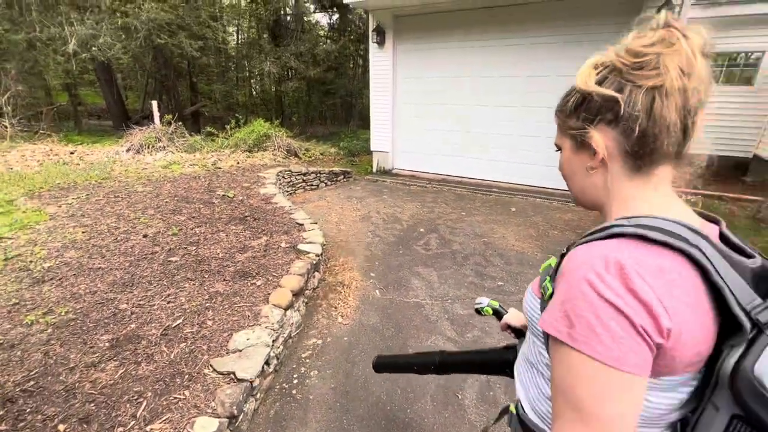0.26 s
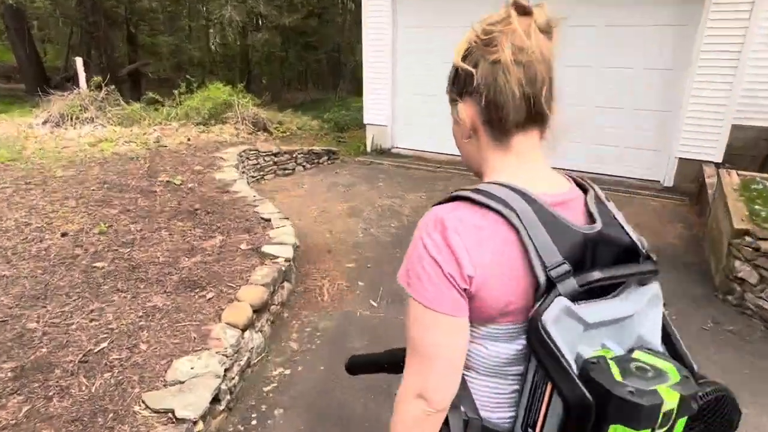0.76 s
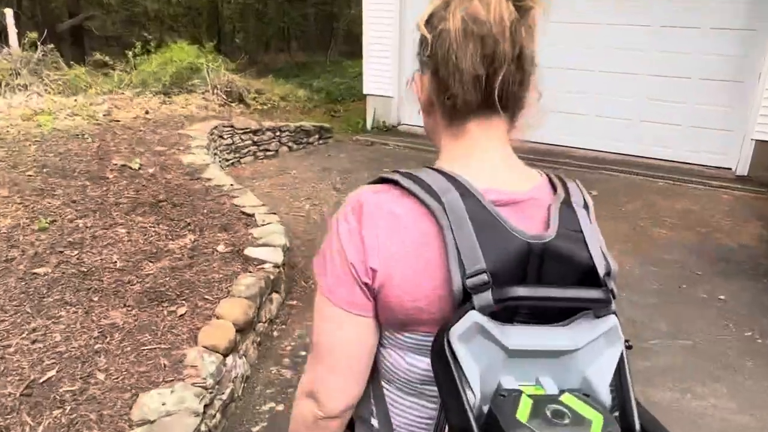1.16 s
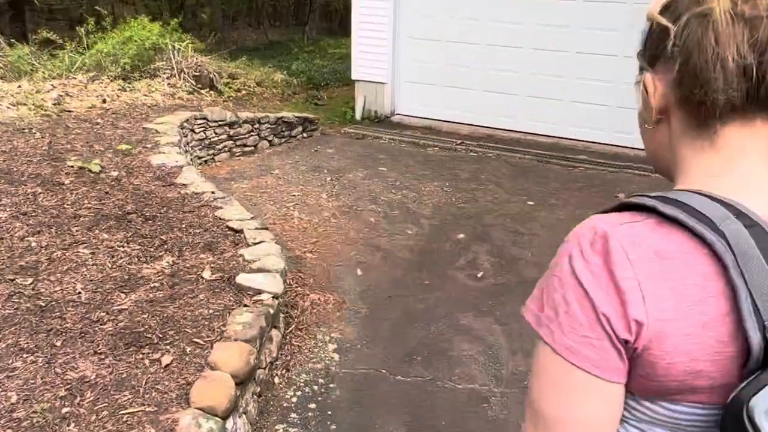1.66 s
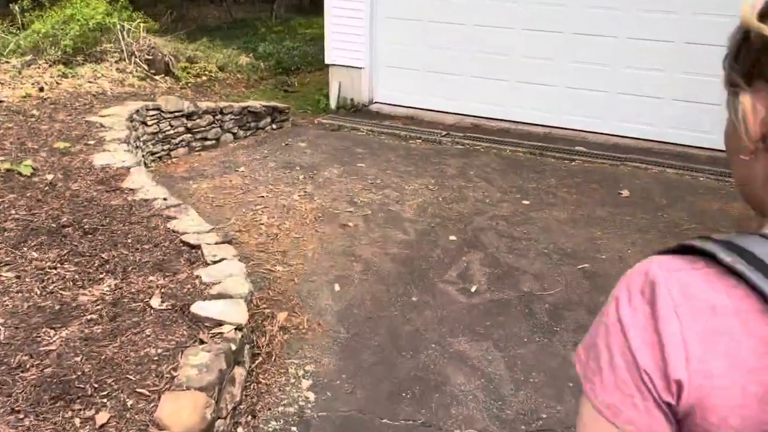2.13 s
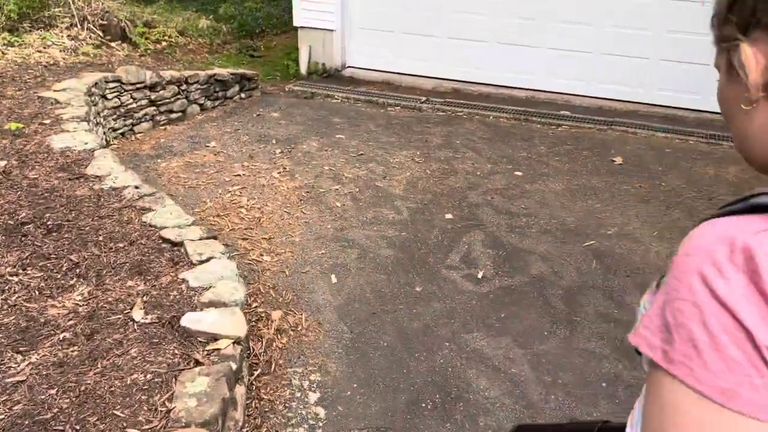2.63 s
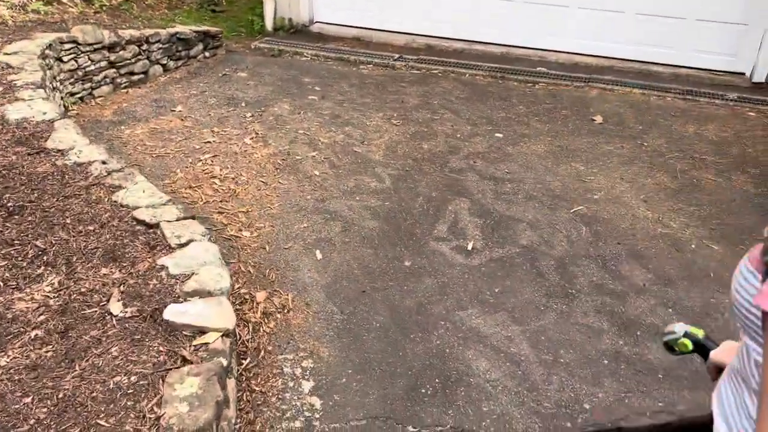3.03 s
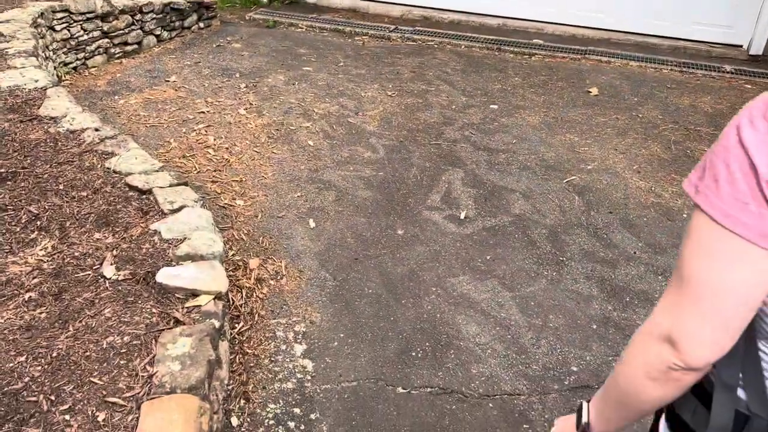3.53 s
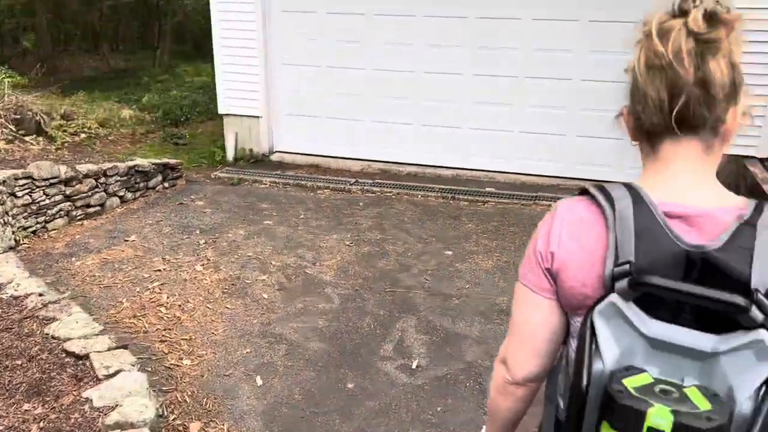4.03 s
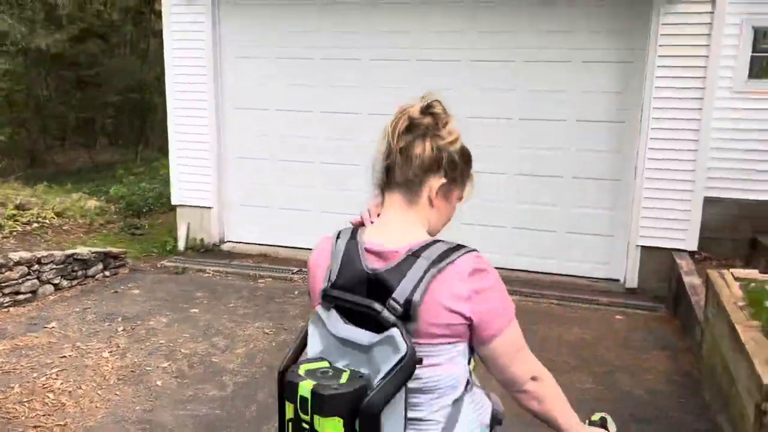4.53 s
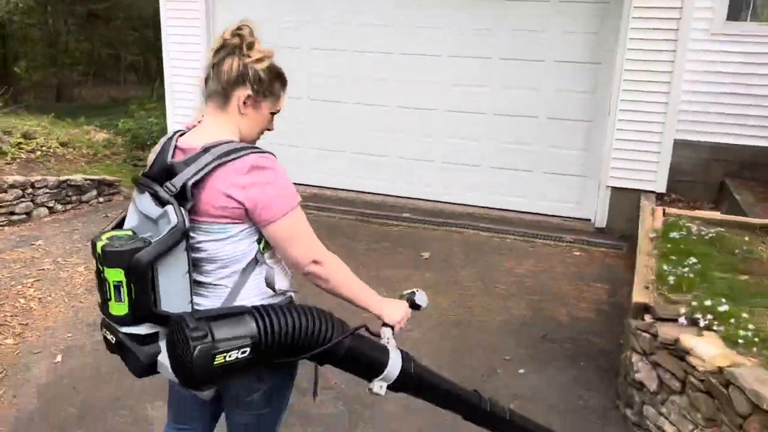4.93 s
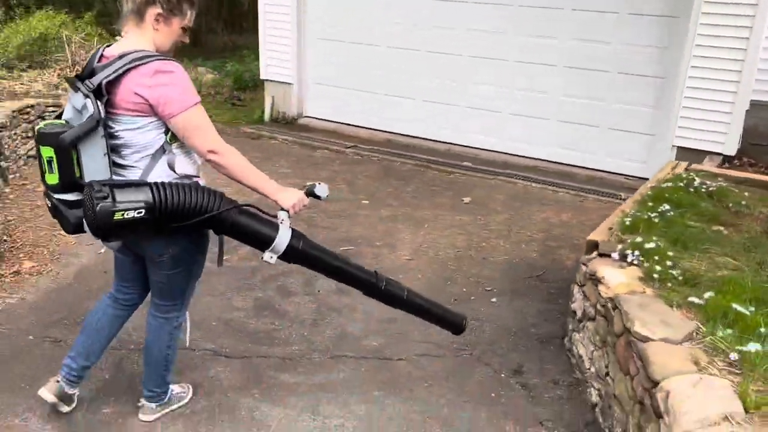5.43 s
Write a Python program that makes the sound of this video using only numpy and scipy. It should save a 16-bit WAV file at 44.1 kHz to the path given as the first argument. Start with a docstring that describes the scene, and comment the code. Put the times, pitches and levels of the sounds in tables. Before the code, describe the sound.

A battery-powered backpack leaf blower runs at full speed on a driveway, a step or two from the microphone. A loud, hissing rush of air carries a hollow hum from the tube and a thin, high fan whine. The hiss and whine swell twice as the wearer's back turns toward the microphone, then ease near the end, when a lower roar of air comes forward a little.

```python
"""A loud rush of air with a high whine in it: a battery backpack leaf blower at full speed on a
driveway, a step or two ahead. Turbulence makes the rush, ringing in the tube and roaring out over the
asphalt. The twelve-blade fan hums at the shaft rate and whines at the blade-passing rate. The intake
hiss is beamed backwards, so it swells whenever the wearer's back turns to the microphone."""
import sys
import numpy as np
from scipy import signal
from scipy.fft import rfft, irfft
from scipy.io import wavfile
from scipy.ndimage import map_coordinates

SR = 44100
rng = np.random.default_rng(int(sys.argv[2]) if len(sys.argv) > 2 else 0)


def materialize(psi):
    """Save the field psi as 16-bit PCM at rate SR to the path in sys.argv[1].

    A 1-D psi becomes a single channel; in a 2-D psi each row is a channel.
    """
    bounded = np.clip(np.atleast_2d(psi).T, -1, 1)
    quanta = np.round(bounded * 32767).astype(np.int16)
    wavfile.write(sys.argv[1], SR, quanta)


N = 250929
T = np.arange(N) / SR
HZ = np.maximum(np.arange(N // 2 + 1) * SR / N, 1)


def from_db(db):
    """Amplitude ratio: tenfold for every 20 dB."""
    return 10 ** (np.asarray(db) / 20)


def rms_one(x):
    """Normalisation to unit power."""
    return x / np.sqrt(np.mean(x ** 2) + 1e-20)


def curves(rows):
    """Linear interpolation in time, one curve per value column."""
    times, *columns = np.transpose(rows)
    return [np.interp(T, times, column) for column in columns]


def curve(rows):
    """Linear interpolation in time of the first value column."""
    return curves(rows)[0]


def over_hz(points):
    """Interpolation on a logarithmic frequency axis."""
    hz, value = np.transpose(points)
    return np.interp(np.log(HZ), np.log(hz), value)


def drift(rate_hz):
    """Random modulation: low-passed noise of unit power."""
    step, settle = 40, 2000
    pole = np.exp(-2 * np.pi * rate_hz * step / SR)
    white = rng.standard_normal(N // step + settle + 2)
    slow = signal.lfilter([1], [1, -2 * pole, pole * pole], white)[settle:]
    return np.interp(np.arange(N) / step, np.arange(len(slow)), rms_one(slow))


def complex_drift(rate_hz):
    """Quadrature modulation: random in both amplitude and phase."""
    return drift(rate_hz) + 1j * drift(rate_hz)


def narrow_noise(hz, width_hz):
    """Narrow-band noise: a randomly modulated carrier of unit power."""
    return rms_one(np.real(complex_drift(width_hz) * np.exp(2j * np.pi * hz * T)))


def pan(balance_db):
    """Constant-power panning; a positive balance favours the left."""
    gains = from_db(np.array([balance_db, -balance_db]).reshape(2, -1) / 2)
    return gains / np.sqrt(np.mean(gains ** 2, axis=0))


def delayed(channel, delay_ms):
    """Propagation delay along a changing path."""
    return map_coordinates(channel, [np.arange(N) - delay_ms * SR / 1000], order=3, mode="mirror")


# Direction of the blower: time_s, left_lag_ms, balance_db
BEARING = [(0, 0.15, 0.5), (.55, .12, 0.5), (1.12, 0.013, -0.5), (1.75, 0.095, -2.5), (2.4, 0.056, -4),
           (3.8, 0.089, -3.5), (4.14, 0.015, -2.3), (4.52, -0.0062, -1.5), (4.78, -0.06, 3),
           (5.69, -0.11, 3.5)]
def place(x, lag_ms, balance_db):
    """Time and level differences between the two microphone ports give a source its direction."""
    return np.array([delayed(x[0], lag_ms / 2), delayed(x[1], -lag_ms / 2)]) * pan(balance_db)


def reflect(x, delay_ms, strength):
    """Comb filtering: a sound interferes with its moving echo."""
    echo = np.array([delayed(channel, delay_ms) for channel in x])
    return (x + strength * echo) / np.sqrt(1 + strength ** 2)


# Echo off the wearer's back: time_s, delay_ms, strength
BACK_ECHO = [(0, 0.69, 0.077), (.5, 0.59, 0.1), (.8, 0.42, 0.22), (1.85, 0.41, 0.13), (2.45, 0.36, 0.18),
             (3.0, 0.56, 0.053), (3.55, 0.4, 0.083), (3.95, 0.5, 0.34), (4.2, 0.615, 0.29),
             (4.5, 0.74, 0.25), (4.9, 0.85, 0.17), (5.69, 0.97, 0.22)]
TREBLE_ECHO_SHARE = 0.45  # clothing returns less of the treble
def off_back(x, share=1):
    """Reflection off the wearer: the delay grows and the comb slides down as the pack turns away."""
    delay_ms, strength = curves(BACK_ECHO)
    return reflect(x, delay_ms, share * strength)


# The wearer's walk: time_s, distance_m
WALK = [(0, 1.22), (1.0, 1.17), (2.5, 1.1), (3.1, 1.13), (3.7, 1.07), (4.1, 1.07), (4.6, 1.24),
        (5.05, 1.46), (5.35, 1.64), (5.69, 1.95)]
def off_ground(x):
    """Ground reflection: with distance the asphalt's echo follows sooner and stronger."""
    distance_m = curve(WALK)
    return reflect(x, delay_ms=2.45 / distance_m, strength=0.13 * distance_m)


# Echoes off the pack, arms and stone edging: shortest_ms, longest_ms, wander_ms, strength
SCATTER = (1.0, 5.0, .09, .125)
def scattered(x, count):
    """Scattering: faint echoes on wandering paths ripple the spectrum."""
    shortest_ms, longest_ms, wander_ms, strength = SCATTER
    total = x
    for delay_ms in np.geomspace(shortest_ms, longest_ms, count) * rng.uniform(0.9, 1.1, count):
        path_ms = delay_ms + wander_ms * drift(0.61)
        sign = rng.choice([-1, 1])
        total = total + sign * strength * np.array([delayed(channel, path_ms) for channel in x])
    return total / np.sqrt(1 + count * strength ** 2)


# A dip that slides down the treble as the wearer turns: time_s, centre_hz, depth
NOTCH = [(3.88, 15000, 0.2), (4.05, 13900, 0.7), (4.16, 12600, 0.8), (4.27, 11700, 0.75), (4.5, 10800, 0)]
def sliding_notch(x, width_hz=3000):
    """Cancellation: subtracting a moving band leaves a notch."""
    centre_hz, depth = curves(NOTCH)
    carrier = np.exp(2j * np.pi * np.cumsum(centre_hz) / SR)
    pole = np.exp(-np.pi * width_hz / SR)
    band = 2 * np.real(carrier * signal.lfilter([1 - pole], [1, -pole], x / carrier))
    return x - depth * band


# Likeness of the two ports at full width: frequency_hz, correlation
PORT_CORRELATION = [(60, 0.8), (140, 0.96), (280, 0.89), (550, 0.95), (750, 1), (1000, 0.98), (1200, 0.66),
                    (1500, 0.93), (2000, 0.8), (3200, 0.39), (4500, 0.22), (6100, 0.45), (8000, 1),
                    (9000, 0.65), (10500, -0.76), (12000, -0.28), (15500, -0.28)]
# Spread of the air noise, narrowest when the blower is dead ahead: time_s, width
AIR_WIDTH = [(0, 0.86), (.7, 0.9), (1.14, 0.64), (1.6, 0.72), (3.75, 0.82), (4.15, 0.4), (4.5, 0.2),
             (4.8, 0.7), (5.69, 0.8)]
def air_noise(spectrum, flutter_db, modes=(), width=AIR_WIDTH):
    """Spectral shaping: fluttering noise, lifted at resonances, partly coherent between the ports."""
    power = from_db(over_hz(spectrum)) ** 2
    lift = 1 + sum((from_db(db) ** 2 - 1) / (1 + (2 * (HZ - hz) / width_hz) ** 2) ** 1.5
                   for hz, width_hz, db in modes)
    alike = np.clip(over_hz(PORT_CORRELATION), -0.99, 0.99)
    shares = np.array([1 + alike, 1 - alike, 1 - alike])
    white = rng.standard_normal(shares.shape) + 1j * rng.standard_normal(shares.shape)
    direct, ahead, aside = irfft(white * np.sqrt(shares * power * lift), N)
    apart = np.clip(curve(width), 0, 1)
    ports = direct + np.sqrt(1 - apart ** 2) * ahead + apart * aside * [[1], [-1]]
    return rms_one(ports) * from_db(flutter_db * drift(20.5))


# Fan speed at full throttle, hunting a little with the load: time_s, blade_rate_hz
FAN_SPEED = [(0, 8580), (0.06, 8562), (0.3, 8590), (0.37, 8551), (0.53, 8575), (0.68, 8523), (0.79, 8570),
             (0.87, 8543), (1.05, 8598), (1.28, 8604), (1.47, 8555), (1.6, 8577), (1.84, 8553),
             (1.97, 8575), (2.23, 8561), (2.3, 8587), (2.4, 8583), (2.5, 8550), (2.58, 8585), (2.75, 8602),
             (2.9, 8584), (3.0, 8550), (3.13, 8597), (3.47, 8548), (3.66, 8591), (3.92, 8550), (4.02, 8582),
             (4.2, 8593), (4.28, 8575), (4.34, 8522), (4.48, 8589), (4.58, 8557), (4.92, 8540),
             (5.02, 8565), (5.11, 8533), (5.2, 8564), (5.31, 8531), (5.5, 8555), (5.58, 8587), (5.69, 8586)]
BLADES = 12
def shaft_angle():
    """Rotor phase in radians: the integral of the shaft's angular speed."""
    return 2 * np.pi * np.cumsum(curve(FAN_SPEED) / BLADES) / SR


# The distant outdoor background: frequency_hz, density_db
RUMBLE_SPECTRUM = [(20, -40), (40, -29), (62, -18), (100, 0.5), (150, 1), (220, 2.5), (400, -45),
                   (1500, -45)]
def outdoor_rumble():
    """Ambient noise floor: a steady low rumble."""
    return from_db(-59) * air_noise(RUMBLE_SPECTRUM, flutter_db=1.0) * pan(-0.26)


# A faint tone near 1.2 kHz, at one of the tube's resonances: peak_s, pitch_hz, half_length_s, level_db
BRIEF_TONE = [(2.31, 1227, 0.015, -32.5)]
def brief_tone():
    """Tone pulse: a sine swells and fades under a Gaussian envelope."""
    return sum(from_db(db) * np.exp(-((T - peak_s) / half_s) ** 2) * np.sin(2 * np.pi * hz * T)
               for peak_s, hz, half_s, db in BRIEF_TONE)


# A narrow band of the hiss: time_s, level_db
ANTIPHASE_LEVEL = [(0, -41), (.6, -38), (1.0, -35), (1.8, -45), (2.4, -58)]
def antiphase_hiss():
    """Phase opposition at the ports makes one band seem to come from both sides at once."""
    return from_db(curve(ANTIPHASE_LEVEL)) * narrow_noise(hz=3350, width_hz=200) * [[1], [-1]]


# Spectra of the jet's roar and the treble of small eddies: frequency_hz, density_db
JET_SPECTRUM = [(20, -52), (60, -45), (100, -8.5), (150, -3.5), (240, -1.5), (380, -0.5), (600, -1),
                (1000, -21.5), (2500, -46)]
TREBLE_SPECTRUM = [(200, -84), (6000, -3), (7600, -4), (8600, 0), (9400, 0), (10500, 1), (11500, 3.5),
                   (12300, 0), (13100, 6.5), (13900, 0), (15000, -8)]
# The jet, loud when the nozzle swings out from behind the wearer: time_s, relative_db
JET_LEVEL = [(0, -41), (0.55, -47.5), (0.93, -41.5), (1.17, -56.5), (2.55, -50.5), (2.88, -57), (3.05, -46),
             (3.2, -51), (4.73, -51), (4.85, -42.5), (5.45, -43), (5.69, -46.5)]
# The nozzle crossing from left to middle: time_s, hiss_balance_db, roar_width
NOZZLE = [(.45, 16, 1), (1.1, 1, 0.5), (3.5, 8, 0.6), (4.7, 0, 0.1), (5.69, 0, 0.04)]
def nozzle_jet():
    """Jet noise: turbulent mixing roars and hisses where the nozzle points."""
    jet_db = curve(JET_LEVEL)
    roar_width = [(time_s, width) for time_s, _, width in NOZZLE]
    roar = from_db(jet_db + 0.5) * air_noise(JET_SPECTRUM, flutter_db=1.0, width=roar_width)
    hiss = from_db(jet_db + 8.5) * air_noise(TREBLE_SPECTRUM, flutter_db=-1.5)
    return roar * pan(-0.26) + hiss * pan(curve(NOZZLE))


# Flow noise in the tube: frequency_hz, density_db
TUBE_SPECTRUM = [(40, -60), (150, -31), (300, -12), (450, 0), (620, -1.5), (820, -1), (1150, -4.5),
                 (1300, 4), (1550, -4), (2200, -12), (4000, -20), (9000, -45)]
# Resonances of the tube: centre_hz, width_hz, lift_db
TUBE_MODES = [(471, 50, 7.5), (687, 43, 10), (992, 105, 11.5), (1210, 46, 4.5), (1416, 40, 9.5),
              (1870, 100, 6)]
# Strength of the tube noise: time_s, relative_db
TUBE_LEVEL = [(0.0, -36.5), (0.42, -36.5), (1.3, -40.5), (3.68, -38.5), (4.1, -38), (4.56, -39.5),
              (4.89, -45.5), (5.69, -51.5)]
def tube_air():
    """Duct resonance: the tube rings with the turbulent air that it carries."""
    lag_ms, balance_db = curves(BEARING)
    air = air_noise(TUBE_SPECTRUM, flutter_db=0.45, modes=TUBE_MODES)
    air = from_db(curve(TUBE_LEVEL) - 1.64) * air
    return place(off_back(air), lag_ms, 0.37 * balance_db)


# The tube's singing, strongest when the pack is seen at a slant: time_s, relative_db
SONG_LEVEL = [(0, -33.5), (.42, -34.5), (.68, -35), (.9, -41.5), (1.4, -43), (2.4, -44), (2.62, -37.5),
              (2.8, -42), (3.05, -39), (3.4, -44), (3.6, -44), (3.9, -38), (4.22, -36.5), (4.45, -38.5),
              (4.58, -35), (4.72, -40), (5.0, -45), (5.69, -50)]
def tube_song():
    """Forced resonance: twice the shaft rate falls on a tube mode, a wavering tone in ringing air."""
    octave = np.sqrt(2) * np.sin(2 * shaft_angle() + 0.73 * drift(12))
    octave *= from_db(-7 + 2.5 * drift(25))
    ringing = from_db(-3.5) * narrow_noise(hz=1457, width_hz=63)
    song = from_db(curve(SONG_LEVEL)) * (octave + ringing)
    return place([song, song], curve(BEARING), balance_db=-0.9)


# The hum, swelling and cancelling as the wearer walks: time_s, relative_db
HUM_LEVEL = [(0.0, -35.5), (0.4, -35.5), (0.92, -39.5), (1.18, -45.5), (1.48, -44.5), (2.2, -43.5),
             (2.85, -43.5), (3.33, -42.5), (3.44, -37), (3.54, -45.5), (4.27, -42), (4.38, -53),
             (4.46, -55), (4.6, -36.5), (4.72, -43.5), (4.84, -48), (5.09, -40), (5.69, -43.5)]
# Weak overtones that follow the tube's level: shaft_multiple, relative_db
SHAFT_ORDERS = [(3, -15), (4, -8), (6, -7.5), (7, -15), (10, -29.5)]
def shaft_hum(radians_per_ms=6.1):
    """Rotor unbalance radiates one cycle per turn; phase jitter smears the higher overtones more."""
    angle, tube_db = shaft_angle(), curve(TUBE_LEVEL)
    port_phase = radians_per_ms * curve(BEARING) * [[-0.5], [0.5]]
    hum_db = curve(HUM_LEVEL) + 0.55 + 1.1 * drift(6.8)
    hum = from_db(hum_db) * np.sin(angle + port_phase) * pan(-0.91)
    overtones = 0
    for order, db in SHAFT_ORDERS:
        jitter = 0.28 * order * drift(9.5) + 0.81 * np.array([drift(26), drift(24)])
        level_db = tube_db + db - 1 + 3.5 * drift(9.3)
        overtones = overtones + from_db(level_db) * np.sin(order * angle + jitter)
    return np.sqrt(2) * (hum + off_back(overtones))


# The top of the treble: frequency_hz, density_db
SIZZLE_SPECTRUM = [(200, -80), (12000, -34), (13600, -17), (14400, 3), (15000, 1), (15700, 2), (18000, 0.5)]
# Strength of this narrowest beam: time_s, relative_db
SIZZLE_LEVEL = [(0, -6), (0.35, 5), (0.7, 2.5), (0.98, 6), (1.68, -1), (2.35, 3), (2.68, -4.5), (3.25, -2),
                (3.62, 11), (3.97, 7), (4.35, 8), (4.54, 5), (4.66, -1.5), (5.69, -5)]
def fine_eddies():
    """Directivity grows with frequency: the fan's smallest eddies sizzle in a narrow beam."""
    sizzle_db = curve(SIZZLE_LEVEL)
    treble_db = -33 + 0.65 * curve(GRILLE_FACING) + 0.081 * curve(HISS_LEVEL) + 0.3 * sizzle_db
    treble = from_db(treble_db) * air_noise(TREBLE_SPECTRUM, flutter_db=1.24)
    top = from_db(sizzle_db - 32.5) * air_noise(SIZZLE_SPECTRUM, flutter_db=0.7)
    return sliding_notch(off_back(treble + top, TREBLE_ECHO_SHARE)) * pan(5 * curve(AIR_WIDTH))


# Spectra of the intake's rush, hiss and grille whistle: frequency_hz, density_db
RUSH_SPECTRUM = [(100, -75), (700, -21), (1130, -5.5), (1350, 2), (1650, -1.5), (2200, 4.5), (2800, 2.5),
                 (3300, -7), (4000, 2.5), (6000, -17)]
HISS_SPECTRUM = [(200, -70), (2200, -29), (3200, -3), (4000, -0.5), (4700, 4), (5300, -3.5), (6000, -8),
                 (9000, -16.5)]
GRILLE_SPECTRUM = [(200, -70), (3600, -44), (4600, -5.5), (5200, -0.5), (5800, 1.5), (6800, -2.5),
                   (7400, -2), (8300, -6.5), (9400, -15), (12000, -27)]
# Resonances of the housing and the grille: centre_hz, width_hz, lift_db
HOUSING_MODES = [(1677, 75, 10.2), (1830, 150, 7.8), (2555, 560, 4.1), (2963, 89, 7.3)]
GRILLE_MODES = [(4930, 360, 4), (6170, 640, 9.1)]
# The rush spreads widely, the hiss peaks at a slant, the grille face on: time_s, relative_db
RUSH_LEVEL = [(0, 4), (0.66, 2), (0.84, 7.5), (1.05, 6), (2.0, -0.5), (2.38, 4), (2.75, -3.5), (3.25, -3.5),
              (3.8, 6.5), (4.05, 5), (4.45, 1.5), (4.7, -2), (5.69, -3.5)]
HISS_LEVEL = [(0, 0), (0.47, 6), (0.8, 3.5), (1.17, -16), (2.0, -2.5), (2.3, 4), (2.7, -3), (3.25, -4.5),
              (3.72, 5), (4.12, 8), (4.42, 8.5), (4.7, 0), (5.69, -8)]
GRILLE_FACING = [(0.0, 0), (0.32, 3), (0.59, 2.5), (0.76, 10), (0.93, 11.5), (1.67, 3.5), (2.0, -3),
                 (2.38, 1), (2.62, -5), (3.24, -5.5), (3.96, 3.5), (4.18, 7.5), (4.68, 3), (4.76, 1.5),
                 (5.69, -6)]
# Lean of the grille's beam as the pack swings round: time_s, balance_db
GRILLE_BALANCE = [(0, -1), (.7, -2), (1.3, -5.5), (1.75, -4), (2.05, 2), (4.2, -1), (4.55, 0.5), (5.69, 1)]
def intake():
    """Directional flow noise: air rushes into the housing and whistles broadly through the grille."""
    lag_ms, balance_db = curves(BEARING)
    grille_balance_db = curve(GRILLE_BALANCE)
    rush = air_noise(RUSH_SPECTRUM, flutter_db=0.77, modes=HOUSING_MODES)
    rush = place(from_db(curve(RUSH_LEVEL) - 32.5) * rush, lag_ms, balance_db)
    hiss = from_db(curve(HISS_LEVEL) - 34) * air_noise(HISS_SPECTRUM, flutter_db=0.95)
    hiss = place(hiss, 0.1 * lag_ms, (balance_db + grille_balance_db) / 2)
    grille = air_noise(GRILLE_SPECTRUM, flutter_db=0.67, modes=GRILLE_MODES)
    grille = from_db(curve(GRILLE_FACING) - 30) * grille
    grille = place(grille, 0.59 * lag_ms - 0.021, grille_balance_db)
    return off_ground(off_back(rush + hiss) + off_back(grille, TREBLE_ECHO_SHARE))


# The blade tone, beamed out of the intake in narrow lobes: time_s, relative_db
WHINE_LEVEL = [(0, -42), (0.17, -38), (0.36, -46), (0.56, -32), (0.72, -47), (0.92, -22.5), (0.99, -26),
               (1.05, -23.5), (1.13, -26), (1.25, -27), (1.38, -41), (1.53, -39), (1.75, -46), (2.0, -44),
               (2.13, -35), (2.53, -34.5), (2.61, -52), (2.74, -39), (3.0, -49), (3.12, -47), (3.28, -51),
               (3.7, -34.5), (3.86, -28.5), (4.01, -37), (4.1, -27), (4.22, -26.5), (4.3, -32), (4.37, -28),
               (4.43, -33), (4.5, -27), (4.57, -37), (4.72, -46), (4.8, -38), (4.87, -48), (4.94, -34),
               (5.02, -46), (5.26, -34), (5.35, -45), (5.42, -35.5), (5.5, -50), (5.64, -33), (5.69, -39)]
def blade_whine():
    """Blade-passing tone: the blades chop an uneven inflow, whose eddies modulate the whine."""
    level_db = curve(WHINE_LEVEL) + 0.4 + 1.5 * drift(15)
    angle = BLADES * shaft_angle() + 0.6 * drift(12)
    tremble = 0.2 * complex_drift(26.2)  # large eddies
    skirt = from_db(-15.5) * complex_drift(171)  # small eddies: hissy sidebands
    port_fading = 0.29 * curve(AIR_WIDTH) * np.array([drift(8) + 1j * drift(12) for port in range(2)])
    tone = np.real((1 + tremble + skirt + port_fading) * np.exp(1j * angle))
    balance_db = 2.5 + 0.2 * curve(HISS_LEVEL) - 3.5 * drift(2.6)  # leans left with the pack at a slant
    return from_db(level_db) * rms_one(tone) * pan(balance_db)


def scene():
    """Superposition: fan tones over the air going in and out, and the outdoor background."""
    hum = shaft_hum()
    whine = blade_whine()
    air_in = intake() + fine_eddies()
    jet = nozzle_jet()
    background = outdoor_rumble()
    tube = tube_air() + brief_tone() + tube_song()
    return background + jet + tube + hum + whine + scattered(air_in, count=6) + antiphase_hiss()


def record(dry):
    """Band limiting: a steep low-pass removes the highest treble."""
    cutoff_hz = 15780
    return irfft(rfft(dry) / np.sqrt(1 + (HZ / cutoff_hz) ** 600), N)


dry = scene()
out = record(dry)
materialize(out)
```